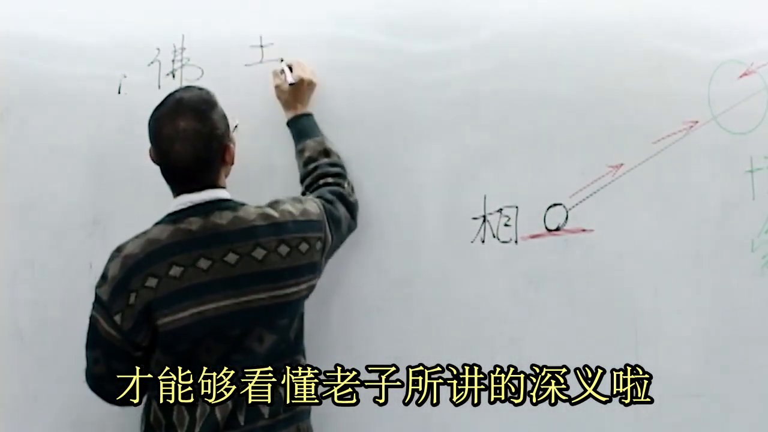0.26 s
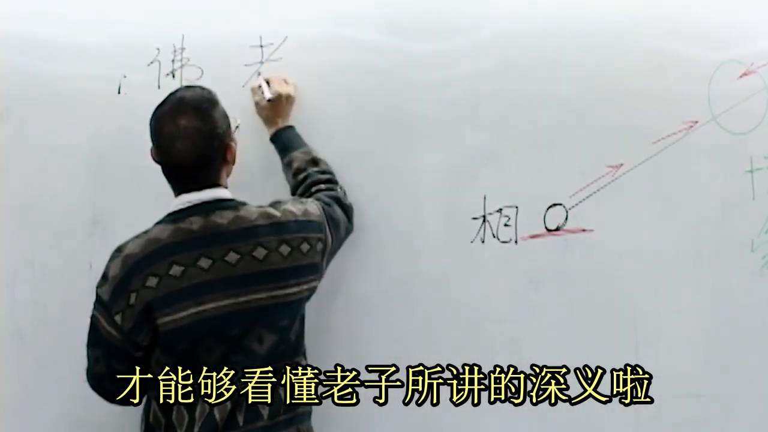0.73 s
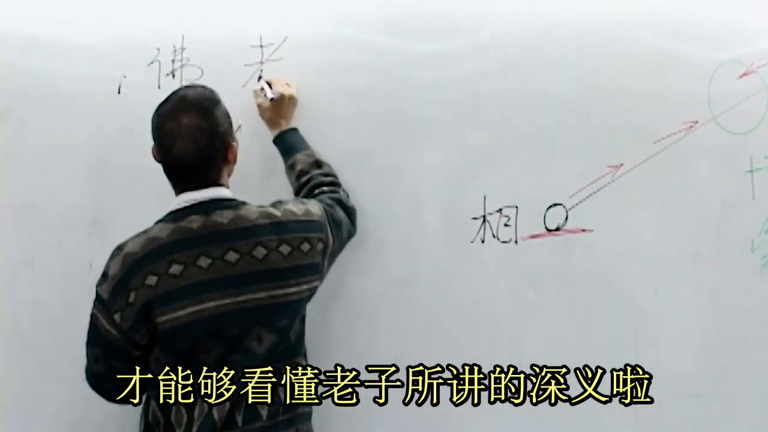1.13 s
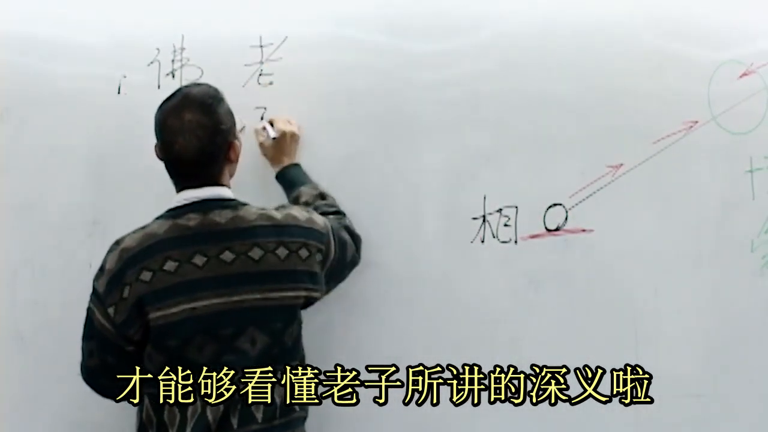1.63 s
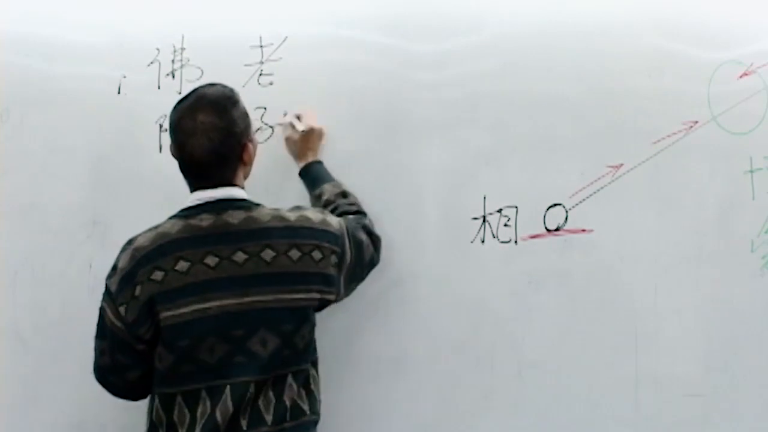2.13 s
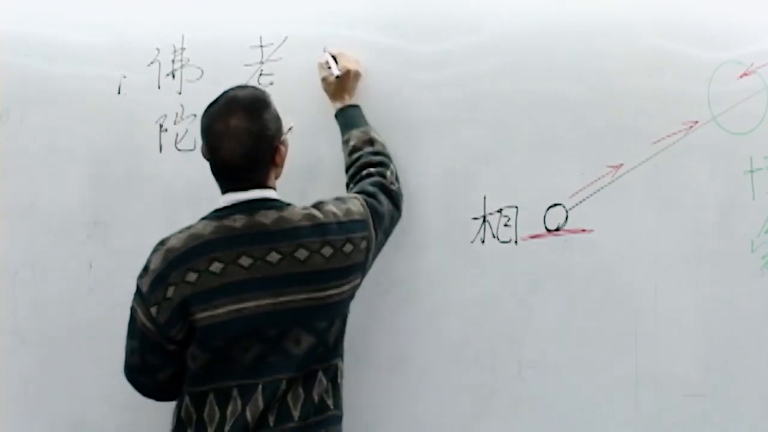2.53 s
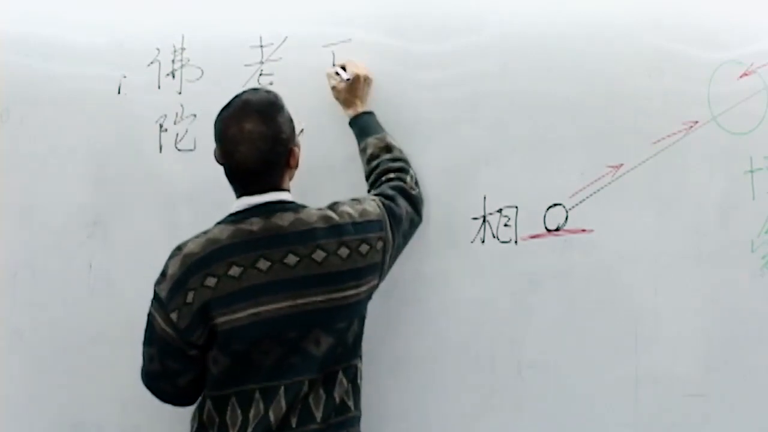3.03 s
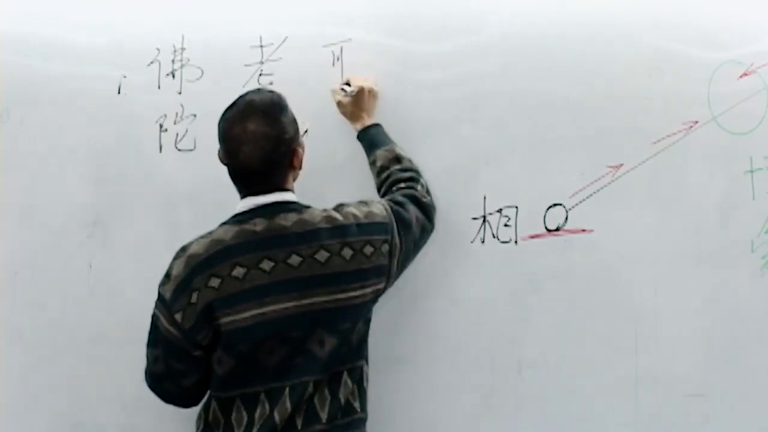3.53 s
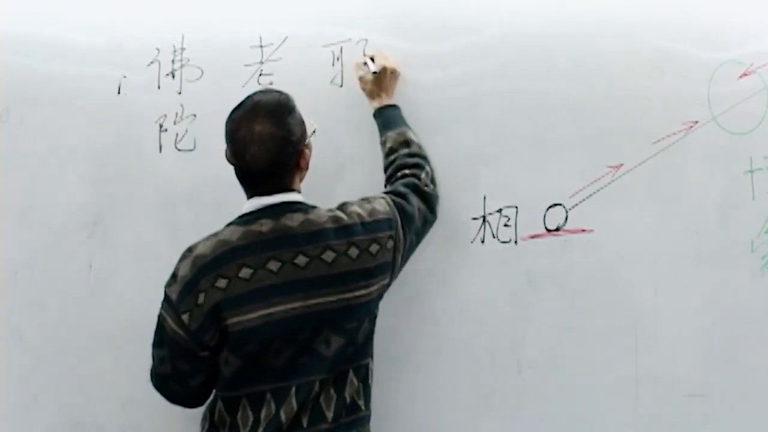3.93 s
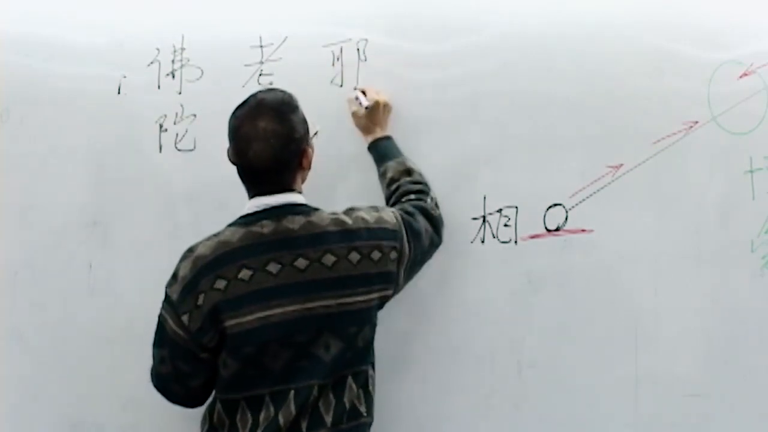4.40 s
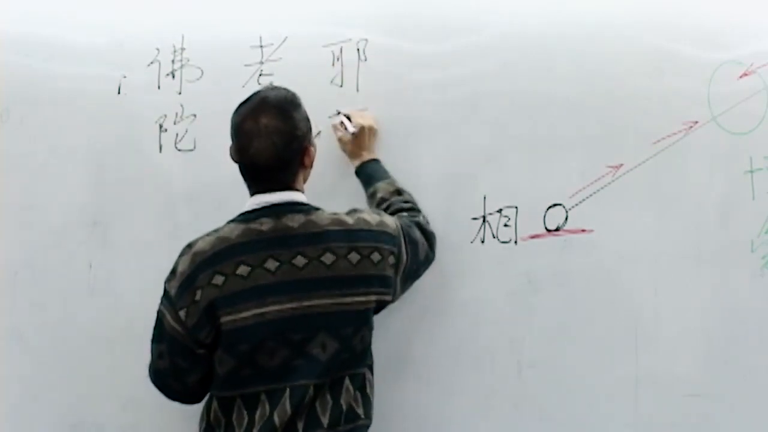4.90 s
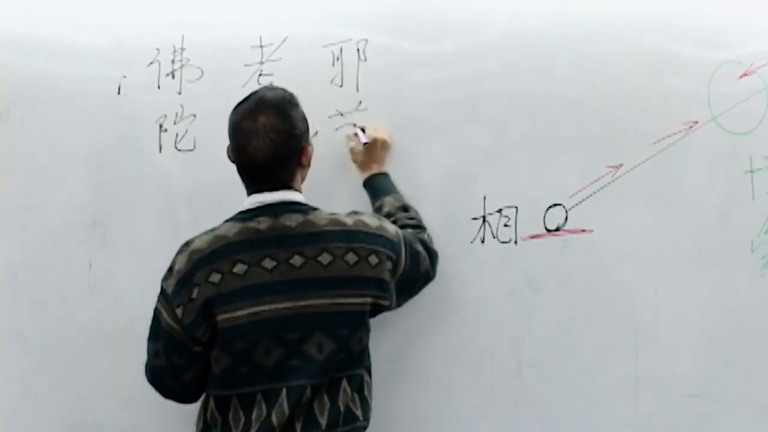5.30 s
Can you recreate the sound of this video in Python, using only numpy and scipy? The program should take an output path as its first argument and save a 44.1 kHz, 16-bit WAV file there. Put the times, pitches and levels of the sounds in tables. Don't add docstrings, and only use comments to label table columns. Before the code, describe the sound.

Brief, very high marker chirps and dry felt scrapes come irregularly from a board, with gaps of near silence between them. Dull hand knocks and light far furniture taps punctuate the writing. The loudest squeak comes after a rough stuttering burst in the second half, and a hard knock comes near the end. Hard walls add short echoes; underneath are an uneven low air drone and a barely audible thin whine.

```python
import sys
import numpy as np
from scipy import signal
from scipy.fft import rfft, irfft
from scipy.io import wavfile
from scipy.ndimage import uniform_filter1d

SR = 44100
rng = np.random.default_rng(int(sys.argv[2]) if len(sys.argv) > 2 else 0)


def undo_db(level):
    steps = np.asarray(level, float) / 20
    return 10 ** steps


def materialize(psi):
    bounded = np.clip(np.atleast_2d(psi).T, -1, 1)
    quanta = np.round(bounded * 32767).astype(np.int16)
    wavfile.write(sys.argv[1], SR, quanta)


N = 244755

# (frequency [Hz], density [dB per Hz])
DRONE_SPECTRUM = [(8.8, -37), (15, -21), (43, 4.5), (72, 5), (93, -13.5), (183, -47.5), (241, -60.5),
                  (400, -49.5), (520, -92.5), (880, -120)]
# (time [s], peak level [dB])
DUCT_SURGES = [(0.34, -41), (0.557, -37), (0.719, -36), (0.872, -48), (1.027, -41), (1.168, -40.5),
               (1.264, -39), (1.44, -42), (1.63, -29), (1.945, -41), (2.22, -45), (2.361, -40),
               (2.503, -44), (2.707, -52), (2.982, -37), (3.235, -35.5), (3.451, -42), (3.743, -30.5),
               (4.049, -53), (4.152, -41.5), (4.454, -42), (4.599, -52), (4.709, -32), (5.004, -31),
               (5.164, -37), (5.258, -42), (5.399, -48)]
# (time [s], level [dB])
DRONE_LULL = [(0, -38.5), (.07, -63.5), (.5, -68.5), (.6, -58), (2.1, -58.5), (3.0, -52.5), (5.55, -51.5)]
# (frequency [Hz], level [dB per bin])
GATE_THRESHOLD = [(100, -83), (400, -83), (1200, -91.5), (1900, -84), (3000, -101), (3350, -79),
                  (3900, -87.5), (4400, -104), (7300, -102), (8000, -103.5), (9000, -106), (15000, -110)]
# (time [s], peak level [dB], centre [Hz], fall [dB per octave squared])
FAR_TAPS = [
    (.002, -58, 790, 89),
    (2.697, -52, 1000, 59),
    (2.717, -56.5, 839, 85),
    (3.479, -45, 990, 5.5),
    (3.509, -45.5, 874, 25),
    (4.55, -52, 990, 86),
    (4.579, -50, 1280, 97),
]
# (frequency [Hz], level [dB], t60 [s])
DESK_MODES = [(630, -10, .2), (705, -26, .12), (852, -1, .17), (987, 0, .16), (1140, -22, .1),
              (1276, -17, .12), (1464, -13, .09), (1590, -22, .1), (1660, -22, .1)]
# (time [s], peak level [dB], brightness [dB], centre [Hz])
HAND_BUMPS = [
    (0.06, -66, 5, 146),
    (1.645, -34, -26.5, 283),
    (3.038, -60, -43.5, 142.2),
    (3.892, -51, -54, 196),
    (4.719, -34.5, -42, 251.5),
    (4.988, -39, -12, 391),
    (5.005, -23, -16, 264),
]
# (frequency [Hz], level [dB], t60 [s])
BOARD_MODES = [(137.9, 7.5, 0.31), (158.8, -4, 0.6), (195.4, -5, 0.16), (225, -1.5, 0.1), (283, 4, 0.078),
               (334.4, -5.5, 0.076), (375, -1.5, 0.11), (435, -2.5, 0.035), (608, -30, 0.3),
               (700, -21, 0.17), (784, -34.5, 0.12), (833, -17, 0.14), (1090, -37, 0.1), (1137, -36, 0.3)]
# (peak time [s], swell [s], tip level [dB], barrel level re tip [dB], pressure [dB])
FELT_STROKES = [(.275, 0.026, -63.5, -18.5, -1.5), (.375, 0.078, -59.5, -24, 2.5),
                (.745, 0.14, -58.5, -6, -18), (.97, 0.19, -75.5, -4, -4), (1.064, 0.042, -50.5, -6.5, -2),
                (1.28, .1, -71, 3.5, -2), (1.46, .08, -82, 5.5, -6), (1.70, 0.066, -70, -3.5, -3),
                (1.77, .06, -62, 0.5, -1.5), (1.91, 0.076, -64, 8.5, -4), (1.95, 0.059, -56, -9.5, 12),
                (2.11, 0.17, -53, -1.5, -9.5), (2.83, .12, -66.5, -21.5, 4), (3.09, .05, -59, -11, -10),
                (3.31, .05, -52.5, -11.5, -4), (3.56, 0.14, -58.5, -7, -4.5),
                (3.715, 0.059, -57, -7.5, 2.5), (4.03, .13, -61.5, -5.5, -9.5),
                (4.441, 0.14, -52.5, -18.5, -10), (4.835, 0.12, -51.5, -9, -2),
                (4.485, 0.013, -71.5, -8.5, 0), (5.245, 0.044, -61.5, -5, -0.5),
                (5.42, 0.064, -47.5, -8, -2.5), (5.522, 0.079, -59, 8.5, -21.5)]
# (frequency [Hz], width [Hz], level [dB])
TIP_MODES = [(4670, 310, 1.9), (4940, 620, 0.014)]
# (frequency [Hz], width [Hz], level [dB])
BARREL_MODES = [(5950, 210, 0.007), (6870, 1100, 0.0084)]
# (start [s], length [s], last pitch [Hz], 2nd order level [dB], odd orders re 2nd [dB])
TIP_CHATTERS = [
    (0.387, 0.0086, 2392, -47, -19),
    (1.098, 0.0061, 2038, -22.5, -11),
    (1.292, 0.0041, 3013, -26.5, -18),
    (2.207, 0.002, 2900, -45, -1.5),
    (3.2515, 0.014, 2900, -19, -18),
    (3.367, 0.012, 2870, -36.5, -13),
    (3.62, 0.023, 2157, -37, -28.5),
    (3.6367, 0.0075, 2124, -27, -25.5),
    (3.648, 0.0034, 2910, -26.5, -10),
    (3.7439, 0.0091, 2900, -10.5, -19.5),
]
# (frequency [Hz], level [dB])
CHATTER_COLOUR = [(6000, 15), (7000, 19.5), (7800, 2.5), (8500, -29), (13000, -33)]
# (time
# [s], pitch [Hz], level [dB])
PANEL_TICKS = [
    (1.657, 3010, -63.5),
    (3.4812, 2750, -47.5),
    (4.48, 2740, -55.5),
    (4.56, 2820, -68),
    (4.877, 2835, -52),
]
# (start [s], length [s], first pitch [Hz], last pitch [Hz], peak level [dB])
TIP_SQUEAKS = [(0.247, 0.013, 4700, 4640, -51.5), (0.382, 0.0076, 4440, 4170, -34),
               (0.894, 0.013, 4450, 4440, -52), (1.0712, 0.024, 4506, 4157, -12),
               (1.295, 0.0094, 4680, 4765, -19), (1.3628, 0.024, 4480, 4248, -20.5),
               (1.6594, 0.0054, 4920, 4870, -27.5), (2.13, 0.021, 4897, 4693, -11),
               (2.8442, 0.029, 4584, 4317, -35), (3.7533, 0.017, 4817, 4985, -4.5),
               (4.131, 0.024, 4454, 4670, -14.5), (4.7406, 0.0068, 4800, 5174, -29.5),
               (4.854, 0.0077, 4805, 4450, -15.5), (5.011, 0.0078, 4990, 5260, -42),
               (5.1807, 0.014, 4425, 4242, -23.5), (5.341, 0.022, 4484, 4663, -14),
               (5.5433, 0.01, 5052, 4986, -11.5)]
# (start [s], gain of 3rd order [dB])
HARD_BITES = [
    (1.0725, 24),
    (3.7532, 27),
    (4.131, 11.5),
    (5.1822, 20),
    (5.5433, 14),
]
# (delay [s], level [dB])
WALL_ECHOES = [(.0295, -13), (.033, -21), (.037, -24), (.059, -27), (.046, -27)]
# (level [dB], t60 [s])
ROOM_TAILS = [(-16.5, .42), (-32.5, 1.6)]
# (frequency [Hz], level [dB])
ROOM_COLOUR = [(300, 6.5), (3000, 6.5), (4500, -2.5), (9000, 3), (15000, -2.5)]


def rms_one(x):
    return x / np.sqrt(np.mean(x ** 2) + 1e-20)


def at_hz(points, hz):
    point_hz, db = np.transpose(points)
    return np.interp(np.log(hz + 1), np.log(point_hz), db)


def smooth(slow):
    return np.interp(np.arange(N), np.arange(0, N, 32), slow)


def drift(rate):
    r = np.exp(-80 * np.pi * rate / SR)
    noise = rng.standard_normal(N // 40 + 2002)
    slow = signal.lfilter([1], [1, -2 * r, r * r], noise)[2000:]
    return np.interp(np.arange(N) / 40, np.arange(len(slow)), rms_one(slow))


def coloured(spectrum):
    hz = np.linspace(0, SR / 2, N // 2 + 1)
    return irfft(rfft(rng.standard_normal(N)) * undo_db(at_hz(spectrum, hz)), N)


def resonate(x, hz, width):
    r = np.exp(-np.pi * width / SR)
    peak = np.array([1, 0, -1]) * (1 - r * r) / 2
    return signal.lfilter(peak, [1, -2 * r * np.cos(2 * np.pi * hz / SR), r * r], x)


def strike(times, modes, levels_db, rattle_s):
    out = np.zeros(N)
    t = np.arange(SR // 4) / SR
    for (hz, level_db, t60), hit_db in zip(modes, levels_db.T):
        force = np.full(N + len(t), 1e-18)
        for s, db in zip(times, hit_db):
            push = np.cos(2 * np.pi * hz * t) + 3 * rng.standard_normal(len(t))
            rattle = push * np.exp(-t / rattle_s) * 2 / (rattle_s * SR)
            force[round(s * SR):][:len(t)] += undo_db(db + level_db) * rattle
        r = undo_db(-60 / (0.6 * t60 * SR))
        w = 2 * np.pi * hz / SR
        ring = signal.lfilter([0, np.sin(w)], [1, -2 * r * np.cos(w), r * r], force[:N])
        out += resonate(ring, hz, .3 * hz)
    return out


def add(out, start, length, hz0, hz1, orders, top, sag_db, rough, bend):
    u = np.arange(-.2, 1.2, 1 / (length * SR))
    edge = 0.00052 / length
    grip = 1 / (1 + np.exp(-(u - edge) / edge))
    grip = grip / (1 + np.exp((u - 1 + edge) / (0.63 * edge)))
    shape = grip * undo_db(-sag_db * np.abs(u - top) ** 2.7)
    wobble = uniform_filter1d(rng.standard_normal(2000), size=12)[:len(u)]
    glide = hz0 + (hz1 - hz0) * np.clip(u, 0, 2) ** bend
    phase = np.cumsum(2 * np.pi * glide * (1 + rough * wobble) / SR)
    tone = sum(undo_db(db) * shape ** (.5 + .5 * k) * np.sin(k * phase) for k, db in orders)
    at = round((start - .2 * length) * SR)
    out[at:at + len(u)] += tone[:N - at]


def thin_whine():
    hz = 9972 + 85 * drift(6) + 50 * drift(50)
    return undo_db(-76) * (.9 + .4 * drift(45)) * np.sin(np.cumsum(2 * np.pi * hz / SR))


def ventilation():
    rise_s, hold_s, fall_db_s = 0.086, 0.017, 119
    s, db = np.transpose(DUCT_SURGES)[:, :, None]
    since = np.arange(0, N, 32) / SR - s
    fall_db = fall_db_s * np.maximum(since - hold_s, 0)
    surge = undo_db(db - 4.0 - fall_db) * np.clip(since / rise_s + .5, 0, 1)
    lull_s, lull_db = np.transpose(DRONE_LULL)
    lull = undo_db(np.interp(np.arange(N) / SR, lull_s, lull_db))
    return (smooth(surge.max(0)) + lull) * undo_db(1.5 * drift(24)) * rms_one(coloured(DRONE_SPECTRUM))


def room_air():
    return undo_db(-3) * 30 * coloured(GATE_THRESHOLD)


def far_taps():
    s, peak_db, centre_hz, fall_db = np.transpose(FAR_TAPS)[:, :, None]
    octaves = np.log2(np.array(DESK_MODES)[:, 0] / centre_hz)
    levels = peak_db + 3.5 - np.abs(fall_db) * octaves ** 2
    return strike(s[:, 0], DESK_MODES, levels, rattle_s=0.0085)


def hand_bumps():
    s, peak_db, bright_db, centre_hz = np.transpose(HAND_BUMPS)[:, :, None]
    hz = np.array(BOARD_MODES)[:, 0]
    colour = np.where(hz > 500, bright_db + 13.5, -20.0 * np.log2(hz / centre_hz) ** 2)
    return strike(s[:, 0], BOARD_MODES, peak_db + 0.5 + colour, rattle_s=0.0038)


def felt_rubbing():
    swell_db, swell_shape, stop_db_s = 22, 0.99, 748.5
    drag_db, drag_fall_db_s = -21, 49
    bursts = [row[::4] for row in TIP_SQUEAKS] + [row[::3] for row in TIP_CHATTERS]
    after = [(s, .002, db - 34.5, -9, 0) for s, db in bursts]
    peak, swell, tip_db, barrel_db, press_db = np.transpose(FELT_STROKES + after)[:, :, None]
    since = np.arange(0, N, 32) / SR - peak
    rise_db = swell_db * np.abs(since / swell) ** swell_shape
    fall_db = np.minimum(stop_db_s * since, drag_fall_db_s * since - drag_db)
    stroke = undo_db(tip_db - np.where(since < 0, rise_db, fall_db))
    barrel = (stroke * undo_db(barrel_db)).sum(0)
    tip_part = ((stroke * undo_db(press_db)).sum(0), stroke.sum(0), TIP_MODES)
    barrel_part = (barrel, barrel, BARREL_MODES)
    out = 0
    for low_gain, high_gain, modes in (tip_part, barrel_part):
        slips = rng.standard_normal(N) * undo_db(1.1 * drift(25))
        low, high = [undo_db(db) * resonate(resonate(slips, hz, width), hz, width) for hz, width, db in modes]
        lower = low * smooth(low_gain) * undo_db(3.0 * drift(5.4))
        upper = high * smooth(high_gain) * undo_db(2.2 * drift(18))
        out = out + (lower + upper) / np.std(high)
    return signal.sosfilt(signal.butter(8, [4250, 7550], "band", fs=SR, output="sos"), out)


def chatters():
    climbs, sinks = np.zeros((2, N))
    for start, length, hz1, db, odd_db in TIP_CHATTERS:
        out, hz0 = (climbs, hz1 * 0.83) if hz1 > 2500 else (sinks, hz1 * 1.12)
        middle_hz = (hz0 + hz1) / 2
        orders = [(1, db + odd_db), (2, db)]
        orders += [(k, db + odd_db + at_hz(CHATTER_COLOUR, k * middle_hz)) for k in (3, 4, 5)]
        add(out, start, length, hz0, hz1, orders, .25, sag_db=23.0, rough=0.064, bend=0.73)
    for start, hz, db in PANEL_TICKS:
        add(climbs, start, .007, hz, hz, [(0.99, db)], .25, sag_db=23.5, rough=0.059, bend=1)
    panel_hz = 2900
    panel = resonate(resonate(climbs, panel_hz, 74), panel_hz, 870)
    return sinks + climbs + undo_db(12.5) * panel


def squeaks():
    out = np.zeros(N)
    for start, length, hz0, hz1, db in TIP_SQUEAKS:
        falling = hz1 < .99 * hz0
        brief = db < -40 or (length < .0105 and db > -35)
        grown = length > .0235
        top = .15 if falling else .2 if grown else .55
        brief_db = -16.5 * brief
        second_db = (-22 - 0.39 * (db + 21.5) if falling else -27.5) + brief_db
        bite_db = sum(gain for s, gain in HARD_BITES if abs(s - start) < length)
        third_db = -56.5 + brief_db + bite_db
        orders = [(1, db), (2, db + second_db), (3, db + third_db)]
        add(out, start, length, hz0, hz1, orders, top, sag_db=13, rough=0.0033, bend=0.99 if falling else 1.4)
        grit_db = db + third_db - 5 + 1.5 * db
        grit = [(k, grit_db) for k in (1.7, 2.25, 2.6)]
        add(out, start, length, hz0, hz1, grit, .2, sag_db=16.5, rough=0.15, bend=1)
        if grown or falling and length > .016:
            whisper = [(0.89, db - 25.5)]
            add(out, start - .024, .024, hz0 * 1.5, hz0 * 1.01, whisper, 1, sag_db=26, rough=0.096, bend=0.92)
    return out


def room(x):
    t = np.arange(SR) / SR
    decay = sum(undo_db(db - 60 * t / t60) * np.sqrt(6 * np.log(10) / t60 / SR) for db, t60 in ROOM_TAILS)
    response = rms_one(coloured(ROOM_COLOUR))[:SR] * decay * np.clip(t / 0.011 - .3, 0, 1)
    walls = np.zeros(SR)
    for delay, db in WALL_ECHOES:
        walls[round(delay * SR)] = undo_db(db)
    response += signal.sosfilt(signal.butter(3, 5500, fs=SR, output="sos"), walls)
    response[0] = 1
    return signal.fftconvolve(x, response)[:N]


def noise_gate(x):
    hz, s, bins = signal.stft(x, SR, nperseg=2048, noverlap=1536)
    power = uniform_filter1d(uniform_filter1d(np.abs(bins) ** 2, size=4, axis=0), size=3, axis=1)
    over_db = 10 * np.log10(np.abs(power) + 1e-20) - at_hz(GATE_THRESHOLD, hz)[:, None]
    gain_db = -60 / (1.0 + np.exp(np.clip(over_db / 1.7, -30, 30)))
    release_db = 108.5 * s
    held_db = np.maximum.accumulate(gain_db + release_db, axis=1) - release_db
    return signal.istft(bins * undo_db(held_db), SR, nperseg=2048, noverlap=1536)[1][:N]


def amplifier_thump(x):
    return .004 * 9 * resonate(resonate(x ** 2, 590, 500), 400, 700)


def scene():
    background = ventilation() + thin_whine()
    board = far_taps() + hand_bumps() + felt_rubbing() + chatters() + squeaks()
    near = noise_gate(room(board) + room_air())
    return np.array([near + amplifier_thump(near) + background])


def low_pass(x):
    return signal.sosfilt(signal.butter(12, 15090, fs=SR, output="sos"), x)


def record(dry):
    mix = dry + undo_db(-92) * rng.standard_normal(dry.shape)
    return low_pass(mix)


dry = scene()
out = record(dry)
materialize(out)
```